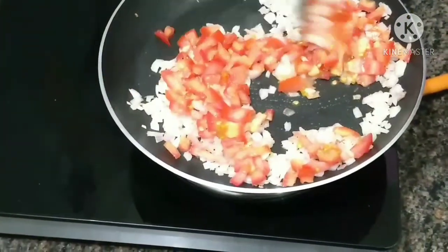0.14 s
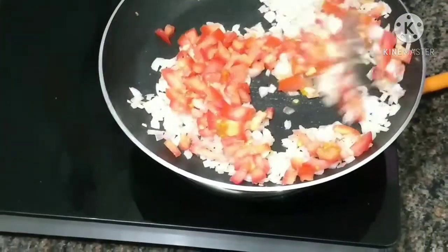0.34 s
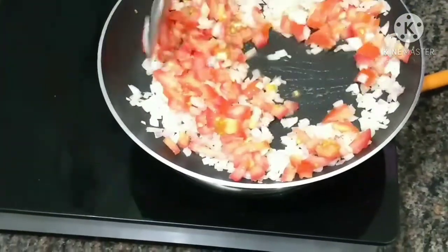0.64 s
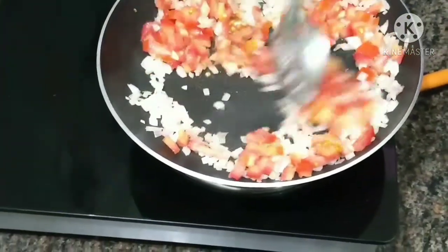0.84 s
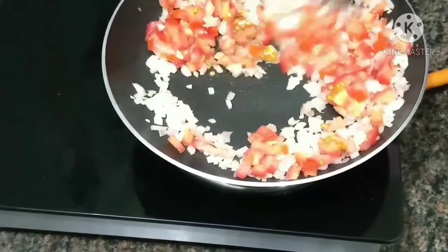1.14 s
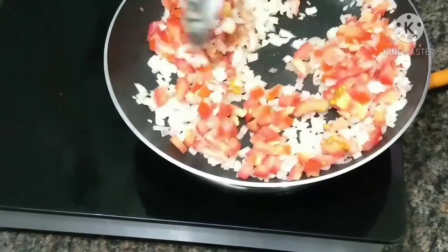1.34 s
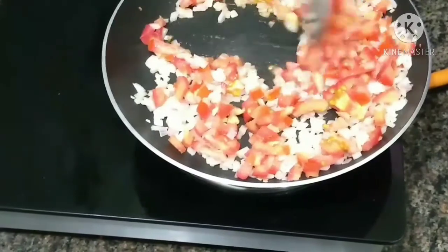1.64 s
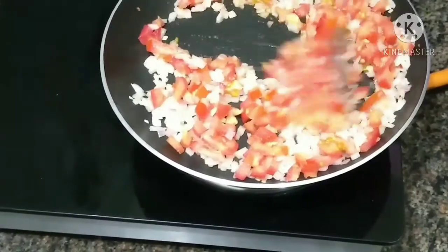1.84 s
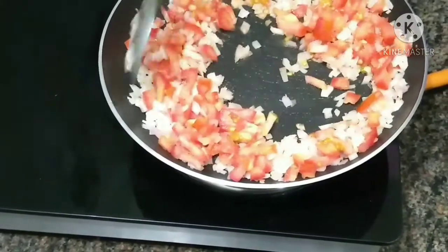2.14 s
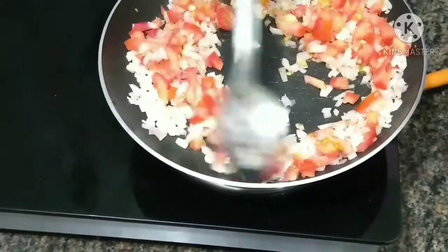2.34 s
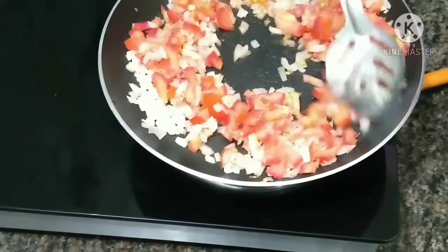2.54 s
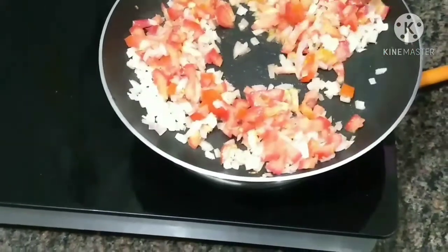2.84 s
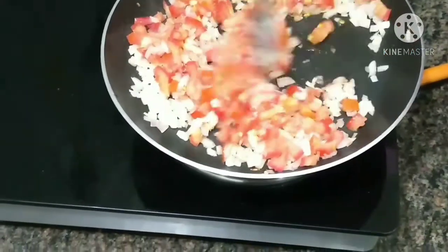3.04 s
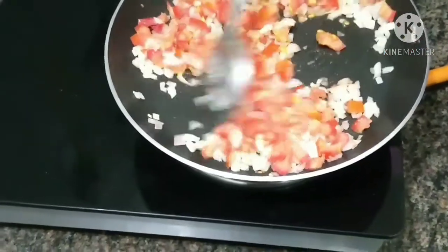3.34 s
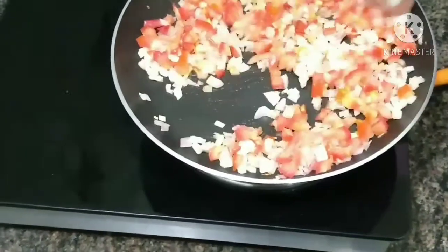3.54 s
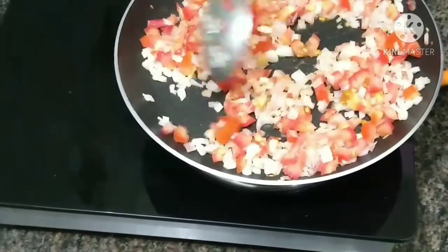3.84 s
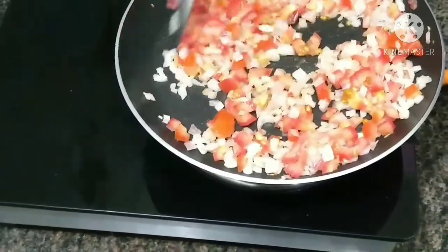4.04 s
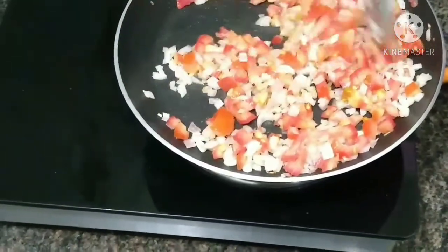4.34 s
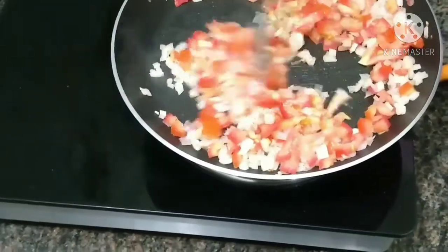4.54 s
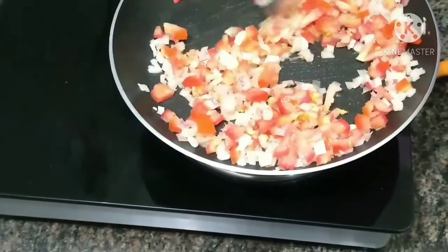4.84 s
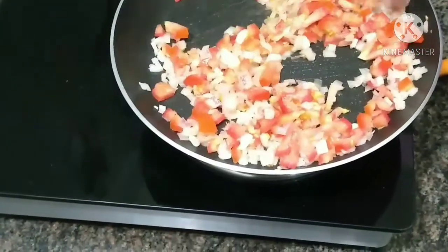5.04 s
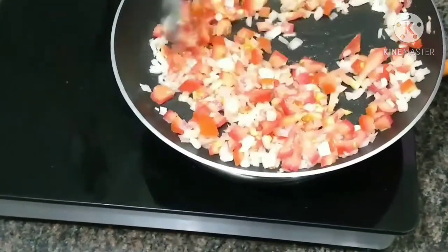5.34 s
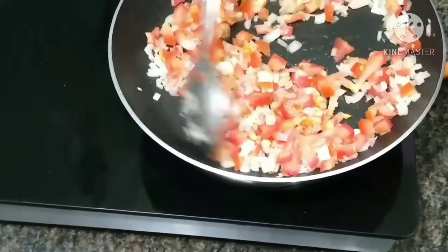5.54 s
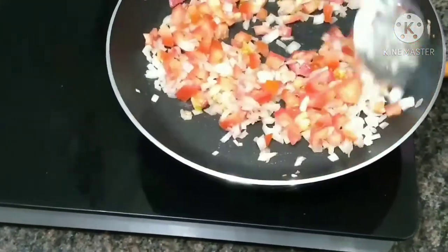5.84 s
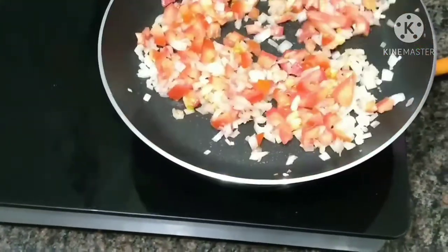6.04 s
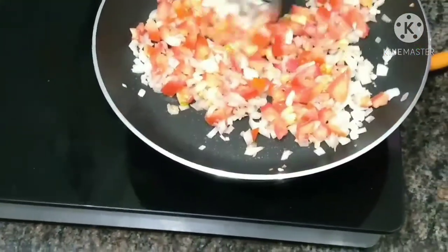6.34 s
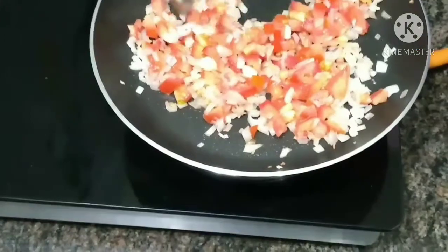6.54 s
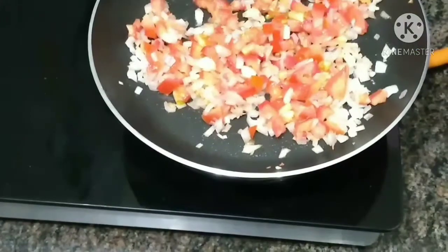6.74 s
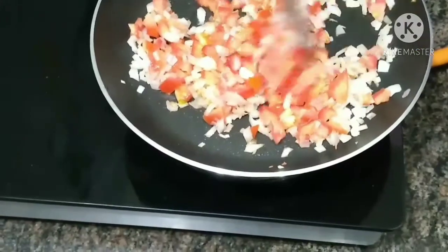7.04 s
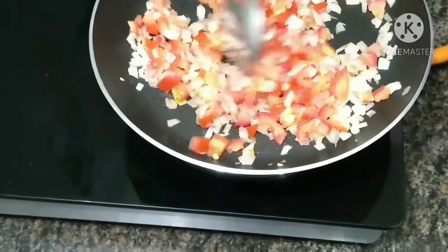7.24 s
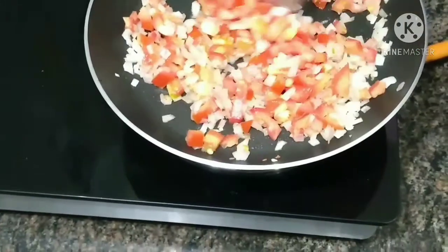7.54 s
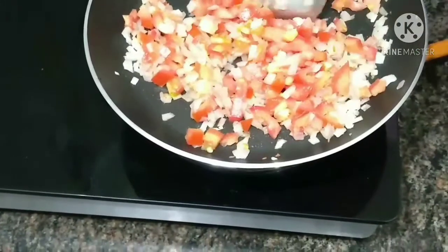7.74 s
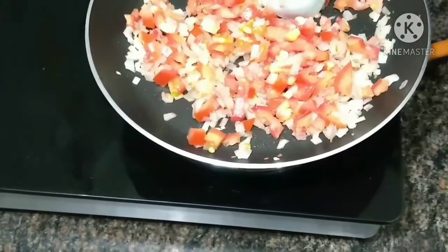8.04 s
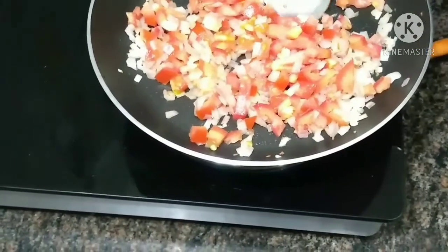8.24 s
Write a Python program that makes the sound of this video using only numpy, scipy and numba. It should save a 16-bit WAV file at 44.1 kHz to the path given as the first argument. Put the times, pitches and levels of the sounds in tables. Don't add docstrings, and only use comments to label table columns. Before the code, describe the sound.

A close, crisp frying hiss with fine spitting, broken by irregular spoon clanks and short scrapes in a thin metal pan, slowly easing off.

```python
import sys
import numpy as np
from scipy import signal
from scipy.fft import rfft, irfft, next_fast_len
from scipy.io import wavfile
from scipy.ndimage import uniform_filter1d
from numba import njit

SR = 44100
rng = np.random.default_rng(int(sys.argv[2]) if len(sys.argv) > 2 else 0)


def dump(signal):
    limited = np.clip(np.atleast_2d(signal).T, -1, 1)
    pcm = np.round(limited * 32767).astype(np.int16)
    wavfile.write(sys.argv[1], SR, pcm)


def makeup_ratio(level_db):
    decades = np.asarray(level_db, float) / 20
    return 10 ** decades


N = 369557
T = np.arange(N) / SR


def frying():
    # t/s, fizz level/dB
    heat = [(0.0, -50), (0.33, -49), (0.54, -45), (0.7, -48), (1.07, -47), (1.75, -49), (2.1, -44.5),
            (2.43, -50), (2.87, -46), (3.05, -48.5), (4.15, -51.5), (4.39, -48.5), (4.7, -50.5),
            (5.32, -50), (6.55, -53.5), (7.1, -50), (7.66, -54), (8.38, -56)]
    # f/Hz, density/dB per Hz
    fizz_colour = [(650, -44), (1100, -16), (1220, -17.5), (1470, -13.5), (1660, -15), (1980, -8.5),
                   (2540, -7), (3220, -1), (3580, -2), (4540, -7.5), (5050, -7.5), (5670, 2), (7800, -19),
                   (10100, -49), (17200, -120)]
    spit_colour = [(4500, -9), (7600, -6.5), (8400, -6), (9300, -2), (13500, -9), (14500, -14),
                   (15300, -17), (16000, -54)]
    fizz_edges = [300, 1400, 2600, 4600, 9000]
    spit_edges = [6000, 10500, 17000]
    fizz_db = np.interp(T, *np.transpose(heat))
    spit_db = -62.4 + 0.75 * (fizz_db + 50)
    fizz = bubbles(fizz_edges, 300, 2.5, hiss=2.7, like=0.47, flicker_db=0.95)
    spit = bubbles(spit_edges, 300, 2.5, hiss=3.7, like=0.13, flicker_db=0.87)
    fizz = level(colour(fizz, fizz_colour), 0)
    spit = level(colour(spit, spit_colour), 0)
    return fizz * makeup_ratio(fizz_db + 3.5) + spit * makeup_ratio(spit_db + 3.5)


def bubbles(edges_hz, rate, spread_db, hiss, like, flicker_db):
    together, out = walk(9), 0
    for low, high in zip(edges_hz, edges_hz[1:]):
        noise = rng.standard_normal((3, N))
        puffs = signal.lfilter([1], [1, -.98], np.abs(clicks(rate, spread_db)))
        flicker = makeup_ratio(flicker_db * (walk(25) + 0.66 * together))
        gate = level((hiss + level(puffs, 0)) * flicker, 0)
        out = out + band(gate * ports(noise[0], noise[1:], like), low, high, order=2)
    return out


def spoon():
    # low f/Hz, high f/Hz, t60/s, level over the clear modes/dB,
    # likeness of the ports/0-1, left minus right/dB
    pan_bands = [
        (258, 1420, 0.046, 13, 0.99, -1.5),
        (1250, 4050, 0.029, 13, 0.48, 1),
        (4700, 6605, 0.026, 15, 0.1, 5.5),
        (82, 203, 0.059, 34, 0.97, 1),
        (8080, 11800, 0.18, 20, .3, -4),
    ]
    # t/s, level/dB into body, edge, bright, air
    knocks = [(0.345, -50, -24, -32.5, -65), (0.367, -69, -31, -52, -74), (2.182, -22, -35, -43, -55),
              (2.196, -18, -31.5, -41.5, -47.5), (3.257, -21.5, -46.5, -38.5, -51.5),
              (3.929, -13, -26.5, -38.5, -28.5), (4.118, -52, -43, -50, -53),
              (4.678, -15.5, -12.5, -10.5, -36), (4.696, -19, -36, -23, -29.5), (5.082, -52, -54, -51, -65),
              (5.695, -26, -50, -46, -62), (6.156, -42, -29.5, -22, -55.5), (6.165, -42, -40, -21, -82),
              (6.175, -17.5, -13, -15, -70), (6.284, -53, -36, -36, -61), (6.515, -29, -48.5, -38.5, -47.5),
              (8.075, -32, -30.5, -41, -52), (8.089, -44, -30, -41.5, -46.5),
              (8.131, -39, -34, -33.5, -47.5)]
    # t/s, level/dB into edge, bright
    pops = [
        (4.219, -52.5, -49.5),
        (4.319, -58.5, -25),
        (4.423, -46, -49),
        (7.452, -52, -34),
        (7.639, -54, -52),
        (7.844, -42, -50),
        (7.859, -47, -41),
    ]
    place_starts = [0, .32, .55, 1.38, 1.72, 2.02, 3.22, 3.9, 4.063, 4.66, 5.05, 5.4, 6.13, 6.49, 7.43,
                    8.05]
    # main ring/dB, body tilt/dB per octave, edge tilt/dB per octave,
    # favoured f/Hz
    places = [(-10, 0, -0.5, 740), (0, -3, 3, 610), (0.5, 5, 9, 870), (-6, 1, 5, 450), (-6, -2, -8, 520),
              (1.5, 0.5, -2, 660), (0.5, -3, -1, 700), (0, -2.5, -6, 510), (-5.5, -2, -9, 480),
              (-6, 5, 2.5, 760), (0, 0, -3, 560), (4, -1, 4, 470), (-2.5, 1, 2.5, 630), (-0.5, 2, -3, 650),
              (5, 5, -1, 820), (-10, -3, -5, 380)]
    strength = pressure()
    place_index = np.searchsorted(place_starts, T, side="right") - 1
    favoured_hz = 1. * np.array(places)[place_index, -1]
    slips = np.array([clicks(2500, 3.7) for _ in range(3)])
    force = [ports(slips[0], slips[1:], modes[4]) * f for modes, f in zip(pan_bands, strength)]
    favoured = np.array([svf(f, favoured_hz, .8) for f in force[0]])
    force[0] = .7 * force[0] + 1.2 * favoured
    spits = [(s, edge - 15, edge, bright, -57) for s, edge, bright in pops]
    for s, *band_db in knocks + spits:
        hit = int((s + .0015) * SR)
        for k, db, gain_db in zip([0, 1, 2, 4], band_db, [16.3, 23.2, 8, 17]):
            force[k][:, hit] += makeup_ratio(db + gain_db)
    out = np.zeros((2, N + SR))
    starts = [int(s * SR) for s in place_starts] + [N]
    for a, b, (ring_db, *tilt_db, _) in zip(starts, starts[1:], places):
        for modes, f, tilt in zip(pan_bands, force, tilt_db + [0, 0, 0]):
            ringing = signal.oaconvolve(pan_response(*modes, ring_db, tilt), f[:, a:b], axes=1)
            out[:, a:a + ringing.shape[1]] += ringing
    return out[:, :N]


def pressure():
    # t/s, time to fade 30 dB/s, body level/dB,
    # edge rasp and bright rasp relative to it/dB
    skids = [(0.0, .1, -37.5, 6.5, -13), (.338, .08, -36.5, 7, -8), (.366, .085, -47, 26, 18),
             (.74, .5, -64, 24, 16), (.975, .06, -57, 10, 5), (1.72, .04, -62, 9, 9),
             (2.186, .25, -35.5, 1.5, -19), (3.26, .12, -33, -2.5, -15), (3.932, .19, -23.5, 4, -16),
             (4.079, .07, -35, 10, -15), (4.683, .12, -28.5, 5, 5), (5.086, .08, -35, -8, -22),
             (5.436, .25, -40.5, -20, -20), (5.534, .14, -42, -14, -18), (5.696, .2, -36.5, -24, -24),
             (6.182, .18, -28, 5, -6), (6.516, .15, -43, -4, -6), (7.478, .12, -57.5, 10, -6),
             (8.086, .08, -34, 5, -8.5)]
    # t/s, length/s, body level/dB, edge rasp and bright rasp relative to it/dB
    drags = [(.04, .05, -57, 11, -6), (.63, .11, -63, 23, 14), (1.42, .06, -60, 15, 14),
             (1.82, .03, -56, 4, 8), (1.88, .03, -62, 5, 6), (2.055, .03, -57, 17.5, 10),
             (2.335, .07, -39.5, -8, -18), (2.44, .1, -42, -7, -10), (2.56, .05, -51, -12, -4),
             (4.725, .05, -34, 13, 4), (5.62, .02, -72, 22, 26), (6.3, .06, -54, -12, -8),
             (8.13, .04, -52, 4, -5)]
    # t/s, time to fade 30 dB/s, level/dB
    bumps = [(.345, .15, -58), (.7, .3, -68), (1.452, .08, -56), (1.524, .06, -45), (1.88, .1, -56),
             (2.2, .35, -56), (3.93, .14, -39), (4.7, .25, -50), (5.1, .15, -63), (5.44, .25, -56),
             (6.198, .15, -53), (6.52, .3, -59), (8.12, .1, -46)]
    fade_factors = [1, .95, 1.05]
    land_db_s, push_db_s, lift_db_s, rock_db_s = 2200, 650, 400, 900
    landings = [row[0] for row in skids[1:]] + [N / SR]
    power = []
    for k, linger in enumerate(fade_factors):
        skidding = sum(contact_power(s, 0, db + (0, *rel)[k], land_db_s, fade * linger, until)
                       for (s, fade, db, *rel), until in zip(skids, landings))
        dragging = sum(contact_power(s, hold, db + (0, *rel)[k], push_db_s, 30 / lift_db_s * linger)
                       for s, hold, db, *rel in drags)
        power.append(skidding + dragging)
    rocking = sum(contact_power(s, 0, db, rock_db_s, fade) for s, fade, db in bumps)
    air = power[2] * makeup_ratio(2 * -24)
    power += [rocking, air]
    return [np.interp(T * 1000, np.arange(len(p)), np.sqrt(p)) * makeup_ratio(-1.5) for p in power]


def contact_power(s, hold, db, rise_db_s, fade, until=99):
    t = np.arange(0, N / SR, 1 / 1000)
    rise_db = rise_db_s * np.maximum(s - t, 0)
    fade_db = 30 * (np.maximum(t - s - hold, 0) / fade) ** 1.25
    return makeup_ratio(2 * np.maximum(db - (rise_db + fade_db), -150)) * (t < until)


def pan_response(low_hz, high_hz, t60, dense_db, like, pan_db, ring_db, tilt_db,
                 place_db=2.5, crack_db=9, crack_s=0.0055):
    # f/Hz, level/dB, t60/s
    pan_modes = [(254.6, -3, 0.29), (366, 1, 0.19), (427.3, 1, 0.095), (497, -5, 0.071), (679, 0.5, 0.094),
                 (786, -8.5, 0.17), (823, -6, 0.1), (943, -4.5, 0.14), (1025, -7, 0.14), (1277, -12, 0.16),
                 (1464, -7, 0.11), (1571, -23, 0.12), (2166, -6.5, .08), (2800, -3, 0.08), (3600, -3, .05),
                 (3568, -6, 0.086), (4510, -23, .06)]
    main_hz, main_t60 = 584, 0.24
    t = T[:SR // 4]

    def tilt(hz):
        octaves = np.log2((hz + 1) / np.sqrt(low_hz * high_hz))
        return tilt_db * np.clip(octaves, -2, 2)

    share, turn = rng.standard_normal((2, len(pan_modes)))
    turn = np.outer(turn * 3 * (1 - like), [0, 1])[..., None]
    clear = sum(makeup_ratio(db + place_db * a + tilt(hz) - 60 * t / ring) * np.sin(2 * np.pi * hz * t + b)
                for (hz, db, ring), a, b in zip(pan_modes, share, turn) if low_hz < hz < high_hz)
    main_ring = makeup_ratio(ring_db - 60 * t / main_t60) * np.sin(2 * np.pi * main_hz * t)
    clear = clear + (low_hz < main_hz < high_hz) * main_ring
    noise = rng.standard_normal((3, len(t)))
    noise_hz = np.arange(len(t) // 2 + 1) * SR / len(t)
    noise = irfft(rfft(noise) * makeup_ratio(tilt(noise_hz)), len(t))
    dense = level(band(ports(noise[0], noise[1:], like), low_hz, high_hz), dense_db)
    decay = makeup_ratio(-60 * t / t60) + makeup_ratio(crack_db - 60 * t / crack_s)
    ring = band(dense * decay + clear, low_hz, high_hz, order=2)
    ring = ring / np.sqrt(np.mean(np.sum(ring ** 2, axis=1)))
    return ring * makeup_ratio(np.array([[pan_db], [-pan_db]]) / 2)


def groan():
    # t/s, f/Hz, level/dB
    slide = [
        (2.97, 322, -82),
        (3.0, 328, -54),
        (3.03, 331, -50),
        (3.06, 342, -47.5),
        (3.09, 350, -44.5),
        (3.11, 353, -55),
        (3.135, 352, -53.5),
        (3.16, 358, -77),
        (3.2, 355, -62),
    ]
    s, hz, db = np.transpose(slide)
    pitch = np.interp(T, s, hz)
    phase = 2 * np.pi * np.cumsum(pitch * (1 + 0.0275 * walk(60))) / SR
    rough = svf(rng.standard_normal(N), 1.2 * pitch, .3)
    rough = level(svf(rough, 1.2 * pitch, .3), -14)
    loudness_db = np.interp(T, s, db, left=-200, right=-200) + 2.5 + 1.5 * walk(50)
    return (np.sin(phase) + rough) * makeup_ratio(loudness_db)


def kitchen():
    # f/Hz, density/dB per Hz
    room_colour = [(15, -42), (25, -15), (151, 0), (199, -7), (388, -5.5), (537, -9.5), (575, -3),
                   (994, -4), (1100, -12), (1500, -1.5), (1950, -47), (3300, -120)]
    noise = rng.standard_normal((3, N))
    hum = colour(ports(noise[0], noise[1:], 0.91), room_colour)
    return level(hum, -67) * makeup_ratio(2.7 * walk(4))


def level(x, db):
    return x * makeup_ratio(db) / np.sqrt(np.mean(x ** 2))


def colour(x, points, phase=((0, 0), (1, 0))):
    hz, db = np.transpose(points)
    size = next_fast_len(N)
    f = np.arange(size // 2 + 1) * SR / size
    turn = np.interp(f, *np.transpose(phase)) * np.minimum(f / 1600, 1) ** 2
    gain = makeup_ratio(np.interp(np.log(f + 1), np.log(hz), db)) * np.exp(1j * turn)
    return irfft(rfft(x, size) * gain, size)[..., :N]


def band(x, low_hz, high_hz, order=3):
    return signal.sosfilt(signal.butter(order, [low_hz, high_hz], "band", fs=SR, output="sos"), x)


@njit
def svf(x, hz, damp):
    y, b, l = np.empty(len(x)), 0., 0.
    for i in range(len(x)):
        g = np.tan(np.pi * hz[i] / SR)
        v = (b + g * (x[i] - l)) / (1 + g * (g + damp))
        b, l, y[i] = 2 * v - b, l + 2 * g * v, damp * v
    return y


def walk(rate):
    k = int(SR / rate)
    held = np.repeat(rng.standard_normal(N // k + 1), k)
    return uniform_filter1d(held, k)[:N]


def clicks(rate, spread_db):
    when, size, sign = rng.random(N), rng.exponential(1, N), rng.standard_normal(N)
    height = makeup_ratio(spread_db * np.minimum(size, 4.5)) * np.sign(sign)
    return level((when < rate / SR) * height, 0)


def ports(common, own, like):
    like = np.clip(like, 0, 1)
    return np.sqrt(like) * common + np.sqrt(1 - like) * own


def scene():
    return frying() + spoon() + groan() + kitchen()


def roll_off(x):
    return signal.sosfilt(signal.butter(12, 15500, fs=SR, output="sos"), x)


def record(dry):
    # f/Hz, left minus right/dB
    port_colour = [(60, 0), (110, -4), (200, 0.5), (380, -0.5), (700, 1), (1280, 2.5), (2370, -5),
                   (4370, 8), (8070, -2.5), (14900, -7)]
    # f/Hz, left leads/radians
    port_phase = [(0, 1.5), (1380, 1.76), (1890, -1.7), (2670, -1), (3530, -1.14), (5940, -2), (6800, -5),
                  (8010, -2.5), (10200, -2), (12300, -11), (14000, -12.5), (14300, -13.5), (14700, -9),
                  (15100, -15)]
    half = np.array(port_colour) * [1, .5]
    left = colour(dry[0], half, port_phase)
    right = colour(dry[1], half * [1, -1])
    wet = np.array([left, right])
    return roll_off(3 * np.tanh(wet / 3))


dry = scene()
out = record(dry)
dump(out)
```